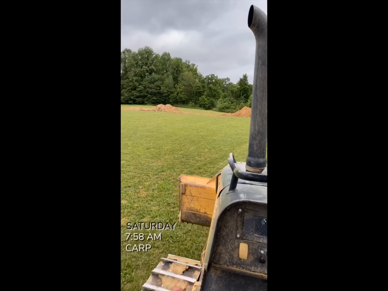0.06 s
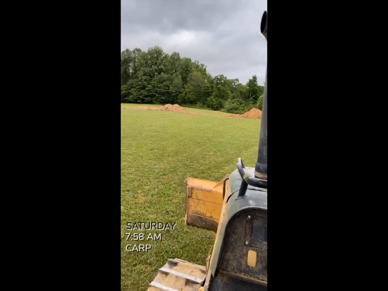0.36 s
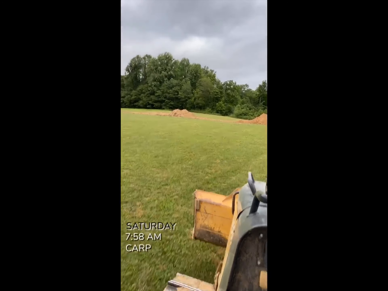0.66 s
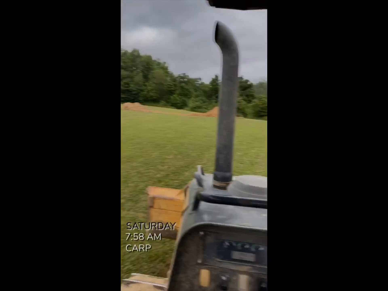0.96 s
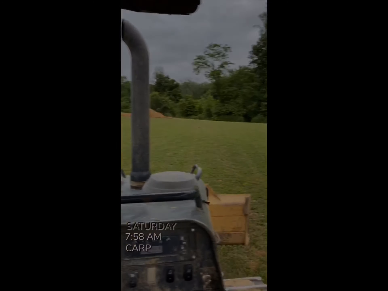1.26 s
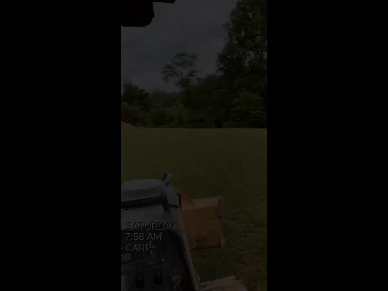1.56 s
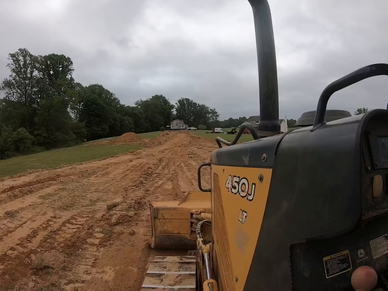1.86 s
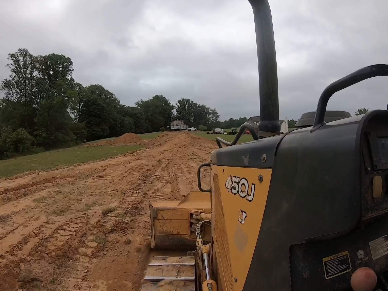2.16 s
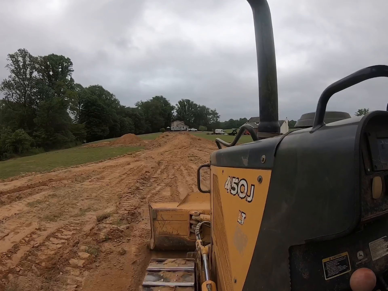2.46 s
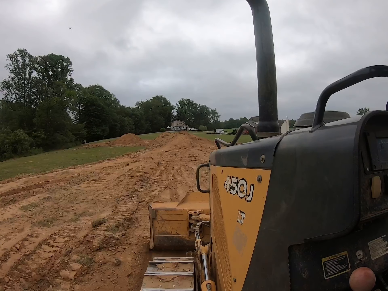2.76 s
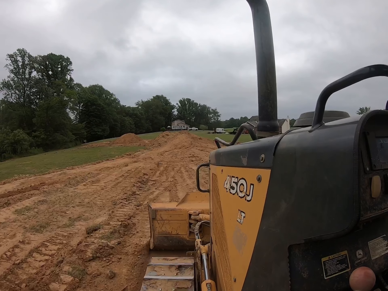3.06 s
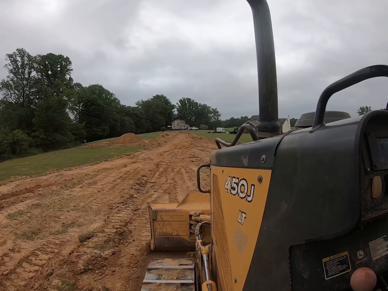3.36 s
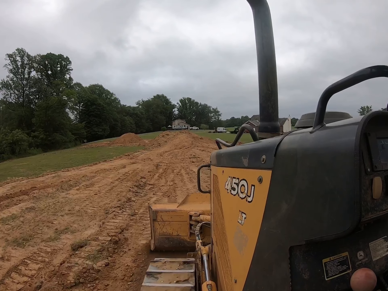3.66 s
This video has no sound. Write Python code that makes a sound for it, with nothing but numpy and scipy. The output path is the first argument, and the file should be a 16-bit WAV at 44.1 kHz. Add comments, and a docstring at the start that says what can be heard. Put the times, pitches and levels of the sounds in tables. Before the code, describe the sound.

A diesel bulldozer crawls along, fading briefly to silence before returning louder with a deep drone, clanking track links and squeaky rattles.

```python
"""A four-cylinder bulldozer diesel at working speed, from the operator's seat, in two scenes.
First, on grass, in mono: the exhaust drones, the fan hums, pistons knock, injectors hiss, the turbo
whistles and track links clank. From 0.7 s the microphone turns to the dashboard and the sound fades out.
At 1.8 s the machine cuts in on bare clay, closer, louder and in stereo, with buzzing plates and short
squeaky flare-ups of a 3.2 kHz rattle. From 3.3 s the turbo's whistle sags as its boost falls."""
import sys
import numpy as np
from scipy import signal
from scipy.fft import rfft, irfft
from scipy.io import wavfile
from scipy.ndimage import uniform_filter1d, map_coordinates

SR = 44100
rng = np.random.default_rng(int(sys.argv[2]) if len(sys.argv) > 2 else 0)


def bounce(signal):
    """Save signal as a 16-bit WAV file at the path given by the first command-line argument."""
    frames = np.transpose(np.atleast_2d(signal))
    limited = np.clip(frames, -1, 1)
    pcm = np.round(limited * 32767).astype(np.int16)
    wavfile.write(sys.argv[1], SR, pcm)


N = 362943
TIME, HZ = np.arange(N) / SR, np.fft.rfftfreq(N, 1 / SR)
LEFT_RIGHT = np.array([[1], [-1]])


def amp(db):
    """Decibels to gain."""
    return 10 ** (np.asarray(db) / 20)


def unit(x):
    """Scales to an rms of one."""
    return x / np.sqrt(np.mean(x ** 2) + 1e-20)


def curve(points):
    """Rows (f/Hz, value) joined by straight lines on a log-frequency axis."""
    hz, value = np.transpose(points)
    return np.interp(np.log(HZ + 1), np.log(hz + 1), value)


def resonances(peaks):
    """The gain in dB of rows (f/Hz, width/Hz, gain/dB)."""
    return sum(db / (1 + (2 * (HZ - hz) / width) ** 2) for hz, width, db in peaks)


def drift(rate_hz):
    """Smooth random wandering of rms one."""
    knots = rng.standard_normal(2048)
    slow = irfft(rfft(knots) / (1 + (np.fft.rfftfreq(2048, TIME[-1] / 2048) / rate_hz) ** 4))
    return unit(np.interp(TIME, np.linspace(0, TIME[-1], len(slow)), slow))


def low_pass(x, edge_hz):
    """Steep low-pass of each channel."""
    taps = signal.firwin(511, edge_hz, window=("kaiser", 9), fs=SR)
    return signal.oaconvolve(x, taps[None], "same", axes=1)


def whistle(hz, width_hz):
    """Narrow noise around a steady or moving pitch."""
    band = 1 + (2 * np.fft.fftfreq(N, 1 / SR) / width_hz) ** 2
    spectrum = (rng.standard_normal(N) + 1j * rng.standard_normal(N)) / band
    carrier = np.exp(2j * np.pi * np.cumsum(hz * np.ones(N)) / SR)
    return unit((np.fft.ifft(spectrum) * carrier).real)


def engine_cycles(speed):
    """Cycles turned so far, four firings to each."""
    return np.cumsum(np.interp(TIME, *np.transpose(speed))) / SR / 4


# likeness of the two microphones at the seat: f/Hz, correlation
MIC_LIKENESS = [(60, 0.3), (290, 2), (640, 0.63), (1400, 0.4), (3100, 0.83), (5500, 0.54), (7000, 0.6),
                (9500, 0.16), (15000, 0)]
# their balance: f/Hz, left minus right/dB
MIC_BALANCE = [(60, -.2), (380, .3), (700, -.5), (1290, -4.5), (2380, -2), (4400, -1.2), (8000, 2.8),
               (15000, 1)]
def microphone_pair(mid, side):
    """Mid and side spectra reach the two microphones as partly alike signals."""
    likeness = np.clip(curve(MIC_LIKENESS), 0, 1)
    side = side * np.sqrt((1 - likeness) / (1 + likeness))
    return irfft((mid + LEFT_RIGHT * side) * amp(LEFT_RIGHT * curve(MIC_BALANCE) / 2), N)


def tones(turns, orders, waver_db, spread=0):
    """Tones locked to a shaft; higher ones waver more and, with spread, reach the pair out of step."""
    out = np.zeros((2, N))
    for multiple, db in orders:
        hz = multiple * turns[-1] / TIME[-1]
        loose = hz / (hz + 250)
        start, side = rng.uniform(-np.pi, np.pi), rng.choice([-1, 1])
        phase = 2 * np.pi * multiple * turns + start + 0.18 * loose * drift(1.7)
        apart = LEFT_RIGHT * side * spread * loose ** 2
        tilt_db = LEFT_RIGHT * np.interp(hz, *np.transpose(MIC_BALANCE)) / 2
        out += amp(db + waver_db * loose * drift(4.8) + tilt_db) * np.cos(phase - apart)
    return out


# the turbo's pitch on grass: t/s, f/Hz
TURBO_PITCH = [(0, 12280), (.55, 12200), (.7, 12420), (.92, 12030), (1.2, 12250), (1.8, 12250)]
def wavering_turbo():
    """The compressor's faint whistle wavers in pitch."""
    return whistle(np.interp(TIME, *np.transpose(TURBO_PITCH)), width_hz=260)


def sagging_turbo(boosted_hz=12860, eased_hz=12370, hold_s=3.3, sag_s=0.8):
    """The compressor's thin whistle holds, then sags as the boost falls."""
    boost = np.exp(-np.maximum(TIME - hold_s, 0) / sag_s)
    return whistle(eased_hz + (boosted_hz - eased_hz) * boost, width_hz=160)


# flare-ups of the rattle, heard at the seat: t/s, relative level/dB
RATTLE_FLARES = [(2.247, -50), (2.766, -48.5), (3.101, -49), (3.594, -50), (3.875, -48), (3.931, -46),
                 (4.2, -47), (5.01, -47), (5.418, -46), (6.886, -51), (7.666, -46), (7.755, -50)]
def rattle_flares(half_length_s=0.014):
    """The 3.2 kHz rattle flares up in short, squeaky bursts."""
    level = sum(amp(db) * np.exp(-((TIME - s) / half_length_s) ** 2) for s, db in RATTLE_FLARES)
    return level * whistle(3230, width_hz=170)


def frame_thud(swell_s, centre_hz=547, width_hz=850, decay_s=0.0048):
    """The blow of a link passes into the track frame as a short, dull knock."""
    t, hz = np.arange(SR // 4) / SR, np.fft.rfftfreq(SR // 4, 1 / SR)
    band = 1 / (1 + (2 * (hz - centre_hz) / width_hz) ** 4)
    mid, side = unit(irfft(rfft(rng.standard_normal((2, len(t)))) * band, len(t)))
    envelope = (1 - np.exp(-(t / swell_s) ** 2)) * np.exp(-np.maximum(t - swell_s, 0) / decay_s)
    return (mid + 0.3 * LEFT_RIGHT * side) * envelope


# modes of a track shoe: ratio to the ring pitch, relative level/dB, t60/s
SHOE_MODES = [(.62, -3.5, 0.1), (1.0, 2.5, 0.094), (1.15, -7, 0.086), (2.35, -30, .06), (3.4, -32, .05),
              (5.3, -20, 0.03)]
def shoe_ring(ring_hz, swell_s, scrape=0.38):
    """A link scrapes briefly as it lands, then the modes of its shoe ring out together."""
    t = np.arange(SR // 4) / SR
    ring = np.zeros((2, len(t)))
    for ratio, db, t60 in SHOE_MODES:
        detune, apart = rng.standard_normal(2)
        grit = unit(uniform_filter1d(uniform_filter1d(rng.standard_normal(len(t)), 160), 60))
        phase = 2 * np.pi * ring_hz * ratio * (1 + 0.011 * detune) * (t - swell_s)
        level = amp(db - 60 * np.maximum(t - swell_s, 0) / t60)
        ring += level * (1 + scrape * grit) * np.sin(phase + 0.3 * LEFT_RIGHT * apart)
    return (1 - np.exp(-2 * (t / swell_s) ** 2)) * ring


def land_links(landings, thud_gain_db):
    """Each landing link rings its shoe and knocks the frame."""
    out = np.zeros((2, N))
    for s, ring_db, ring_hz, thud_db, scrape_ms in landings:
        swell_s = scrape_ms / 1000
        sound = amp(ring_db) * shoe_ring(ring_hz, swell_s)
        sound += amp(thud_db + thud_gain_db) * frame_thud(swell_s)
        start = max(round((s - swell_s) * SR), 0)
        out[:, start:start + sound.shape[1]] += sound[:, :N - start]
    return out


def soft_links(start_s, end_s, level_db, thud_gain_db, links_per_s=5.9, ring_hz=611, scrape_ms=5.33):
    """Links land softly at the pace of the crawl, each a little off in time, force and ring."""
    late, force, detune = rng.standard_normal((64, 3)).T
    when = start_s + (np.arange(64) + 0.5) / links_per_s + 0.028 * late
    db = level_db + 0.5 * force
    rows = np.transpose([when, db, ring_hz * (1 + 0.054 * detune), db, np.full(64, scrape_ms)])
    return land_links(rows[(when > start_s) & (when < end_s)], thud_gain_db)


# hard landings below the seat: t/s, relative ring level/dB, f/Hz, relative thud level/dB, scrape/ms
HARD_LANDINGS = [(.114, -45, 740, -49, 7), (.494, -47, 690, -46, 7), (.689, -46, 460, -47, 7),
                 (.741, -44.5, 524, -43, 7), (.889, -46, 545, -42, 9.3), (1.945, -40, 645, -47, 5),
                 (2.142, -38, 398, -46, 5), (2.512, -36, 626, -47, 5), (2.866, -35, 633, -42, 8),
                 (3.159, -34, 602, -36, 5.9), (3.385, -37, 410, -43, 10), (3.66, -35, 374, -45, 6.7),
                 (3.716, -41, 650, -41, 5), (4.512, -34, 378, -46, 6.1), (4.571, -37, 644, -43, 3.8),
                 (4.728, -37, 640, -43, 5.2), (4.923, -36, 404, -50, 4.6), (4.937, -31.5, 632, -39, 6),
                 (5.143, -36, 420, -42, 4.4), (5.644, -35, 395, -46, 5), (5.724, -35, 617, -41, 5),
                 (5.973, -43, 594, -39, 5), (6.245, -35, 592, -39, 5.3), (6.529, -34, 713, -36, 7),
                 (6.585, -36, 640, -48, 5), (7.139, -40, 526, -30, 7.8), (7.255, -36, 530, -34, 8.6),
                 (7.475, -34, 653, -41, 6.5), (7.588, -35, 567, -42, 6.2)]
def hard_links():
    """Now and then a link drops hard on the rollers."""
    return land_links(HARD_LANDINGS, thud_gain_db=3.5)


def facing(start_s=0.68, turn_s=0.42):
    """How far the microphone has turned towards the dashboard, 0 to 1."""
    return np.clip((TIME - start_s) / turn_s, 0, 1)


# hum and whine at the dashboard: multiple of the cycle rate, relative level/dB
DASH_ORDERS = [(18, -47.5), (52.5, -58.5)]
def dashboard_hum(cycles):
    """Two engine tones swell as the microphone turns to the dashboard."""
    return facing() * tones(cycles, DASH_ORDERS, waver_db=6.5)


# resonances beside the hood and at the dashboard: f/Hz, width/Hz, gain/dB
HOOD_PEAKS = [(689, 70, 3), (1000, 50, 5), (1350, 90, 7.5), (1860, 80, 6), (2200, 250, 1.5), (2610, 99, 3),
              (3060, 150, 6), (5770, 300, 7), (6630, 410, 8), (7600, 560, 4.5)]
DASH_PEAKS = [(333, 45, 3), (485, 99, 2), (690, 130, 3), (1000, 45, 5), (1390, 400, 2), (1820, 110, 5),
              (2080, 170, 3), (2500, 450, 2), (5530, 700, 4), (6600, 500, 5.5)]
def hood_to_dashboard(x, shade_db=-2.5, shade_hz=5000):
    """Bright beside the hood, the sound turns boxier at the dashboard, where the hood shades the treble."""
    treble_db = shade_db * HZ ** 4 / (HZ ** 4 + shade_hz ** 4)
    spectrum = rfft(x.mean(0))
    hood = irfft(spectrum * amp(resonances(HOOD_PEAKS)), N)
    dash = irfft(spectrum * amp(resonances(DASH_PEAKS) + treble_db), N)
    return hood + facing() * (dash - hood)


# strength of each cylinder's burst: relative level/dB
CYLINDER_DB = [-1, 1, 0.5, -0.5]
def firing_bursts(cycles, decay_firings):
    """A level that jumps at each firing and falls until the next; cylinders and single firings differ."""
    firings = 4 * cycles
    index, age = firings.astype(int), firings % 1
    size_db = np.take(CYLINDER_DB, index, mode="wrap") + 1.5 * rng.standard_normal(1024)[index % 1024]
    return unit(amp(size_db) * np.exp(-age / decay_firings) * (1 - np.exp(-age / 0.08)))


# loose plates, guards and fuel lines near the seat: f/Hz, width/Hz, level/dB
LOOSE_METAL = [(388.5, 58, -49.5), (3230, 220, -57), (6100, 160, -81), (7080, 270, -63.5)]
def rattles(cycles, flutter_db=3.5):
    """Loose metal is shaken by the firings and buzzes in short spurts."""
    shaking = firing_bursts(cycles, decay_firings=0.71)
    return sum(amp(db) * unit(whistle(hz, width) * shaking * amp(flutter_db * drift(20)))
               for hz, width, db in LOOSE_METAL)


# the fan ahead of the seat: harmonic, relative level/dB
FAN_HARMONICS = [(1, 0), (2, -12), (4, -11.5), (5, -23), (6, -21)]
def fan(cycles, waver_db, spread=0, blades_per_cycle=9.895):
    """The belt-driven fan hums at the rate its blades pass."""
    return tones(blades_per_cycle * cycles, FAN_HARMONICS, waver_db, spread)


def piston_knock(cycles):
    """Pistons and valves strike the block in the same pattern every cycle."""
    pattern = rng.standard_normal((2, 2400))
    place = (cycles % 1) * pattern.shape[1]
    strikes = np.array([map_coordinates(row, [place], order=3, mode="grid-wrap") for row in pattern])
    return unit(strikes) * firing_bursts(cycles, decay_firings=1.2)


def panel_ripple():
    """Crowded sheet-metal modes leave fine peaks and dips, in dB, that merge in the high treble."""
    knots_hz = np.arange(0, SR / 2, 55)
    depth_db = 4 * HZ / (HZ + 1500) / (1 + (HZ / 4000) ** 2)
    return depth_db * np.interp(HZ, knots_hz, rng.standard_normal(len(knots_hz)))


def blend(spectrum, sound, share):
    """Gives a sound its share of the power in a spectrum."""
    return np.sqrt(share) * rfft(sound) + np.sqrt(1 - share) * spectrum


def clatter(cycles, body_db, knock, hiss, roar, shake_db):
    """Fan air, exhaust gusts, injector hiss and piston knock, all sounding through block and hood."""
    air, gas, fuel = rng.standard_normal((3, 2, N))
    # the gusts throb once per crank turn and once per firing
    throb = unit(1 + 0.18 * np.cos(2 * np.pi * 2 * cycles) + 0.25 * np.cos(2 * np.pi * 4 * cycles))
    injectors = fuel * firing_bursts(cycles, decay_firings=1)
    knock_band = HZ ** 2 / (HZ ** 2 + 800 ** 2) / (1 + (HZ / 2600) ** 8)
    drive = blend(rfft(air), gas * throb, roar / (1 + (HZ / 1500) ** 2))
    drive = blend(drive, injectors, hiss * HZ ** 2 / (HZ ** 2 + 2500 ** 2))
    drive = blend(drive, piston_knock(cycles), knock * knock_band)
    mid, side = drive * amp(body_db + panel_ripple()) * HZ / np.hypot(HZ, 15)
    shake = amp(shake_db * drift(9.1))  # the whole machine shakes as it crawls
    return unit(microphone_pair(mid, side)) * shake


# exhaust and timing gears, farther off and close by: multiple of the cycle rate, relative level/dB
FAR_ORDERS = [(3.5, -56), (4, -42.2), (6, -54), (8, -51), (12, -59.5), (16, -61), (18, -54.5), (36, -64),
              (52, -63), (60, -62.5), (69, -65), (72, -65), (80, -66.8), (84, -68.8), (95, -67),
              (98, -65.5), (102, -68.4), (136, -69.7)]
CLOSE_ORDERS = [(4, -31.1), (6, -56), (7, -51.5), (8, -43.8), (9, -53.5), (12, -51.5), (16, -54.5),
                (18, -48.3), (20, -51), (21, -56), (22, -46.5), (23, -55.5), (24, -56), (25, -61),
                (26, -57), (31, -61), (32, -57), (33, -56), (36, -57.5), (48, -54), (51.25, -60.5),
                (53, -63), (59, -64.5), (71, -53.2), (72, -55.8), (76, -62), (81, -63.5), (84, -57.5),
                (89, -61.5), (102, -62.5), (108, -65), (114, -59), (120, -62), (128.5, -64.5), (140, -67),
                (170, -62.5)]
def exhaust_drone(cycles, close):
    """Exhaust pulses drone at the firing rate, with the timing gears' tones above."""
    if close:
        return amp(3) * tones(cycles, CLOSE_ORDERS, waver_db=0.9, spread=0.49)
    return amp(2.5) * tones(cycles, FAR_ORDERS, waver_db=0)


# firing rate on grass: t/s, f/Hz
GRASS_FIRING = [(.1, 76.4), (.7, 76.95), (1.3, 76.55), (1.7, 76.7)]
# colour of the clatter, farther off: f/Hz, relative level/dB
FAR_COLOUR = [(20, -27), (40, -15), (65, 2.5), (125, 3), (205, -6), (340, -2.5), (600, -11), (1100, -13),
              (2600, -15.5), (3500, -24.5), (4300, -28.5), (8000, -28), (12300, -29.5)]
def engine_on_grass():
    """The engine a little faster and farther off, as the microphone turns to the dashboard."""
    cycles = engine_cycles(GRASS_FIRING)
    drone = exhaust_drone(cycles, close=False)
    hum = amp(-55) * fan(cycles, waver_db=3.5)
    noise = clatter(cycles, curve(FAR_COLOUR), knock=0.22, hiss=0.2, roar=0.71, shake_db=0.5)
    machine = hood_to_dashboard(amp(-42.5) * noise + amp(-70.5) * wavering_turbo())
    return drone + hum + machine + amp(-2.5) * dashboard_hum(cycles)


# firing rate on clay: t/s, f/Hz
CLAY_FIRING = [(1.85, 72.19), (2.65, 72.55), (2.9, 72.31), (3.75, 72.72), (4.35, 72.45), (6.55, 72.85),
               (7.25, 72.33), (7.75, 72.82), (8.2, 72.7)]
# colour of the clatter, close by: f/Hz, relative level/dB
CLOSE_COLOUR = [(20, -14), (55, -11), (110, -2), (140, -5), (200, -7), (245, -8.5), (310, -7.5), (380, -11),
                (500, -10), (660, -11), (1000, -20), (1170, -21), (1800, -19.5), (2700, -26), (3700, -29),
                (4400, -31), (5300, -34.5), (8000, -38.5), (9300, -41.5), (10400, -41.5), (11400, -54),
                (14000, -58), (15500, -68.7)]
# resonances of block, hood and fuel lines: f/Hz, width/Hz, gain/dB
CLOSE_PEAKS = [(113, 15, 2.5), (1060, 38, 1), (1140, 84, -1), (1280, 94, 3.5), (1460, 200, 4),
               (2070, 270, 1.5), (2310, 62, 1.5), (3160, 640, 5.5), (5750, 210, 5.5), (6050, 140, 6),
               (6950, 1500, 8), (8700, 590, 8), (12450, 500, 5)]
def engine_on_clay():
    """The engine close to the microphone pair, with a deep steady drone."""
    cycles = engine_cycles(CLAY_FIRING)
    drone = exhaust_drone(cycles, close=True)
    hum = amp(-37) * fan(cycles, waver_db=0.45, spread=0.8)
    body_db = curve(CLOSE_COLOUR) + resonances(CLOSE_PEAKS)
    noise = clatter(cycles, body_db, knock=0.19, hiss=0.36, roar=0.62, shake_db=0.55)
    return drone + hum + amp(-34.5) * noise + rattles(cycles) + amp(-89) * sagging_turbo()


def scene(fade_start_s=0.85, fade_end_s=1.812, cut_s=1.829):
    """Grass, in mono, fades to silence; clay cuts in, in stereo."""
    clanks = hard_links()
    grass = engine_on_grass() + clanks + soft_links(0, cut_s, level_db=-52, thud_gain_db=-7)
    clay = engine_on_clay() + clanks + amp(-2) * rattle_flares()
    clay += soft_links(cut_s, TIME[-1], level_db=-42, thud_gain_db=-15)
    mono_grass = low_pass(grass.mean(0, keepdims=True), edge_hz=12500)
    fade = np.clip((fade_end_s - TIME) / (fade_end_s - fade_start_s), 0, 1) ** 1.12
    return np.where(TIME < cut_s, fade * mono_grass, clay)


def record(dry):
    """The recorder's band limit."""
    return low_pass(dry, edge_hz=15700)


dry = scene()
out = record(dry)
bounce(out)
```